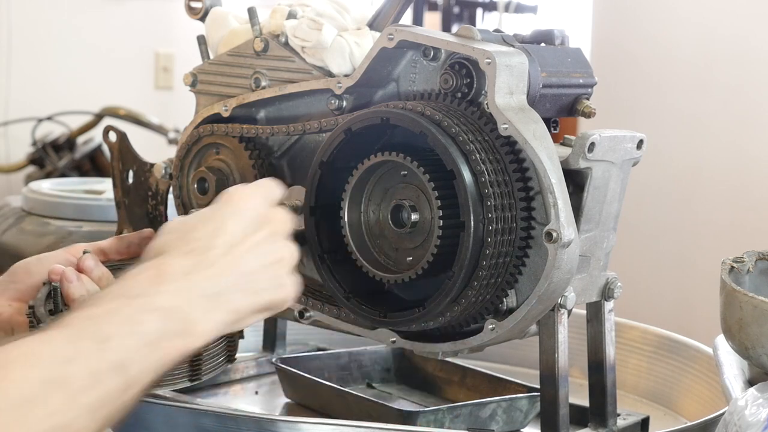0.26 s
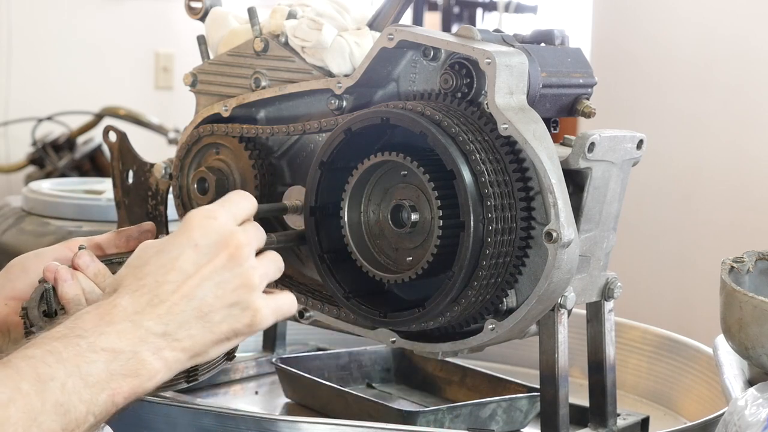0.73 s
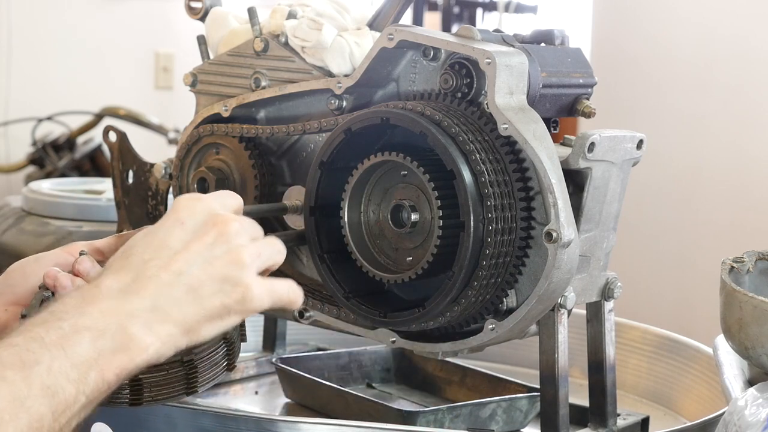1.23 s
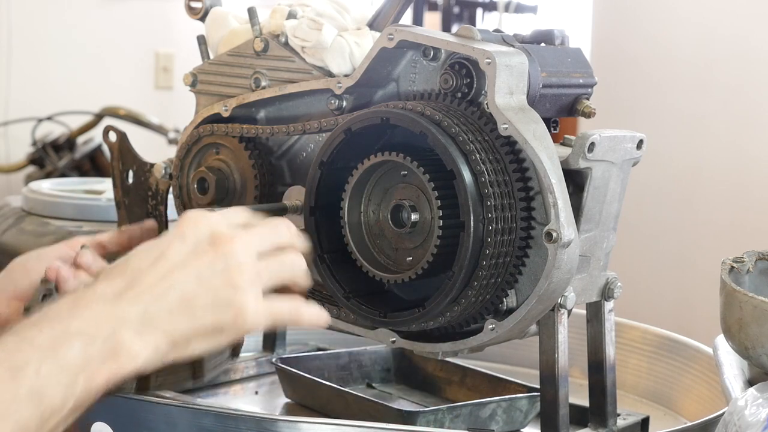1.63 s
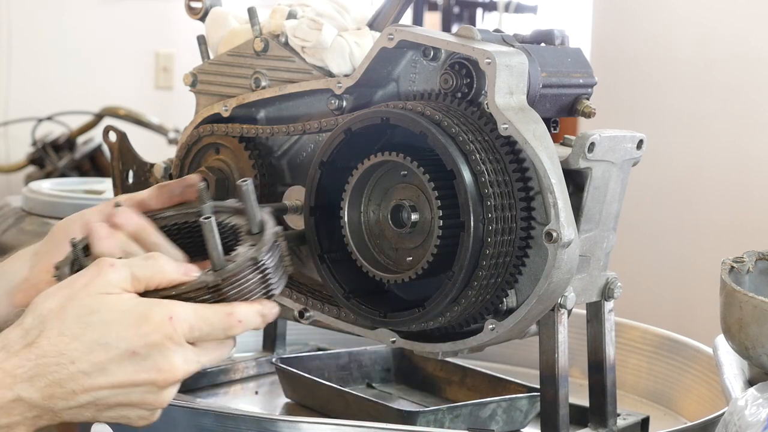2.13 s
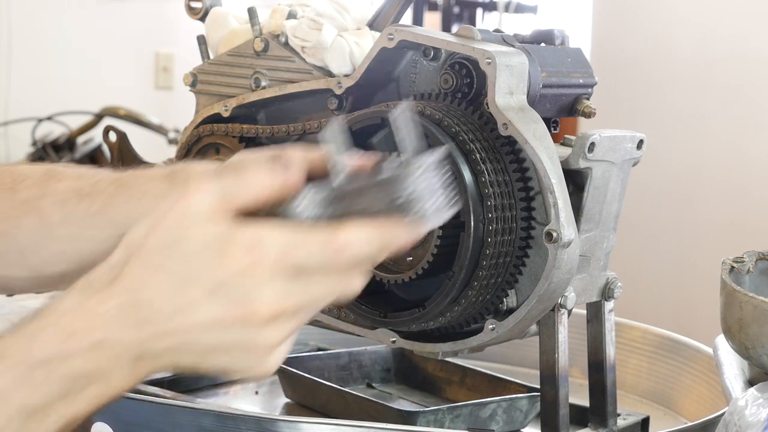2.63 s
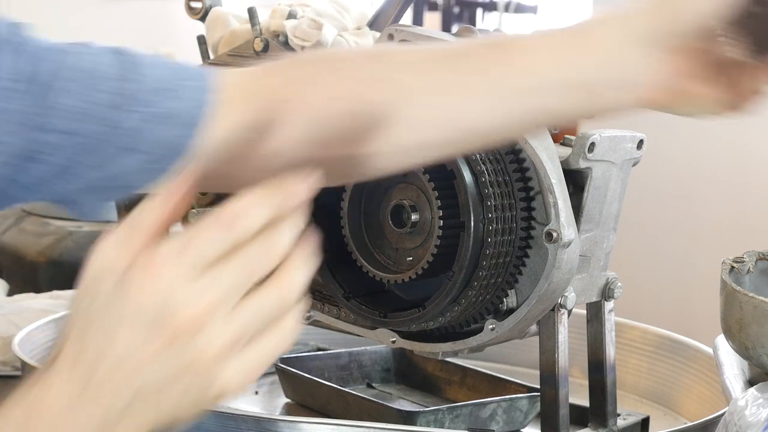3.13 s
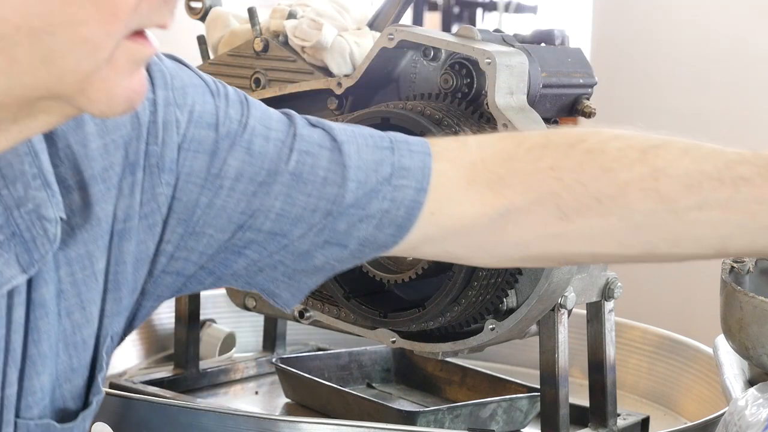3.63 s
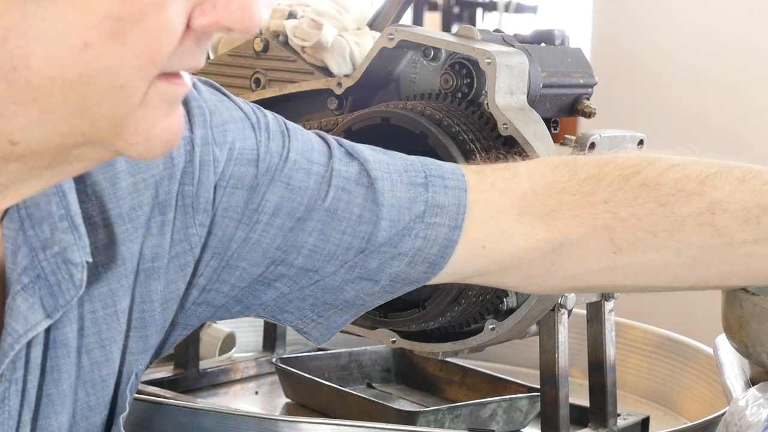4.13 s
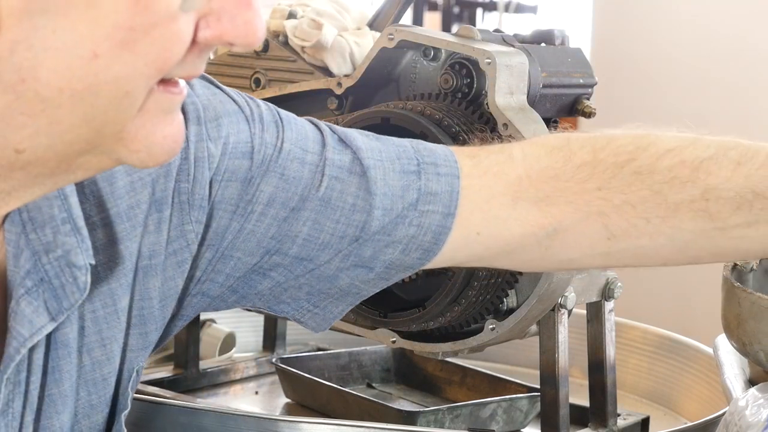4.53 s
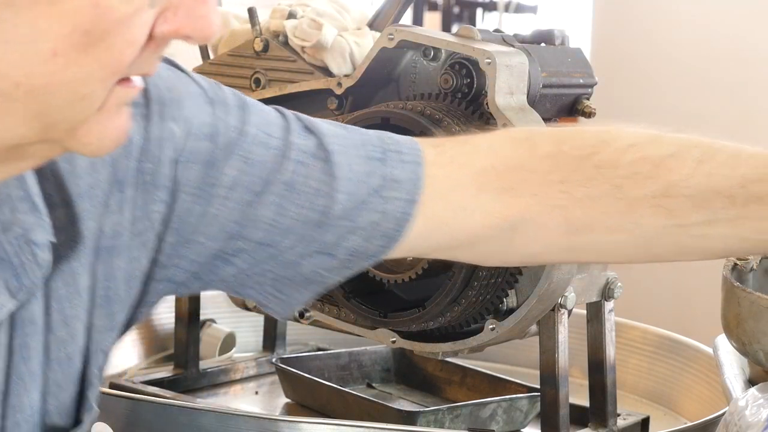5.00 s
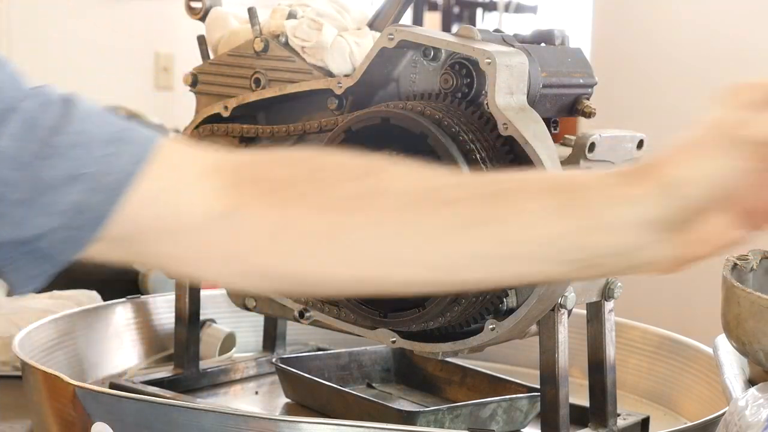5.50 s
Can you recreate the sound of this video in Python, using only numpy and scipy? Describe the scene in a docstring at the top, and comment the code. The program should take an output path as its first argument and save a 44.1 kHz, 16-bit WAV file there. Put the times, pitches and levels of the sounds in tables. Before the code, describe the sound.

In a hard-walled workshop, a small steel part's high ring fades in a metal tray. Sparse dry clicks and brief rattles follow as clutch plates are handled near the microphone. A shirt sleeve rustles close by, then the stack knocks and clashes into the tray, scrapes along and lands with a loud clank. The echo fades over faint low air hum.

```python
"""Steel clutch plates click and rattle dry off their studs, then knock, clash, slide and drop flat on a metal tray.
A shirt sleeve rustles close by; a small steel part sings on in the tray; a workshop echoes over a low hum of air.
Clicks: damped noise plus one sine. Blows: tray modes, filtered noise and detuned plate modes.
Slide, sleeve and air: filtered noise. Echo: convolution with noise decaying band by band."""
import sys
import numpy as np
from scipy import signal
from scipy.fft import rfft, irfft, next_fast_len
from scipy.io import wavfile

SR = 44100
rng = np.random.default_rng(int(sys.argv[2]) if len(sys.argv) > 2 else 0)


def bounce(signal):
    """Save signal as a 16-bit WAV file at the path given by the first command-line argument."""
    frames = np.transpose(np.atleast_2d(signal))
    limited = np.clip(frames, -1, 1)
    pcm = np.round(limited * 32767).astype(np.int16)
    wavfile.write(sys.argv[1], SR, pcm)


N = 253952
TIME = np.arange(N) / SR  # s, whole scene
RING = TIME[:SR]  # s since a contact


def undb(db):
    """Decibels to amplitude gain."""
    return 10 ** (np.asarray(db) / 20)


def read(points, hz):
    """Interpolate (f/Hz, value) rows on a logarithmic frequency axis."""
    f, v = np.transpose(points)
    return np.interp(np.log(hz + 1), np.log(f), v)


def swell(curve):
    """Gain over time, linear in dB between (t/s, level/dB) rows."""
    return undb(np.interp(TIME, *np.transpose(curve)))


def colour(x, points, tilt_db=0):
    """Minimum-phase filter with the given spectrum, tilted in dB per octave about 4 kHz (flat below 800 Hz)."""
    size = next_fast_len(len(x) + 4096, real=True)
    size += size % 2
    hz = np.fft.rfftfreq(size, 1 / SR)
    spectrum_db = read(points, hz) + tilt_db * np.log2(np.maximum(hz, 800) / 4000)
    # fold the cepstrum to positive time: a causal filter
    cepstrum = irfft(np.log(undb(spectrum_db)))
    cepstrum[1:size // 2] *= 2
    cepstrum[size // 2 + 1:] = 0
    return irfft(rfft(x, size) * np.exp(rfft(cepstrum)))[:len(x)]


def level(x, db):
    """Set the rms level."""
    return x * undb(db) / np.sqrt(np.mean(x ** 2))


def burst(x, db):
    """Give a sound the energy of 10 ms at this rms level."""
    return x * undb(db) / np.sqrt(np.sum(x ** 2) / (SR / 100))


def fade(t60_s):
    """Exponential decay, 60 dB in t60_s."""
    return np.exp(-np.log(1000) * RING / max(t60_s, 1e-4))


def crack(t60_s):
    """Decaying noise: countless close modes that die together."""
    return rng.choice([-1, 1], SR) * fade(t60_s)


def clink(hz, t60_s):
    """One decaying resonance."""
    return np.sin(2 * np.pi * hz * RING) * fade(t60_s)


def grit(spread_db):
    """Noise of dense tiny contacts; spread_db scales their exponentially distributed excess level."""
    return rng.standard_normal(N) * undb(spread_db * np.minimum(rng.exponential(size=N), 7))


def add(track, s, x):
    """Mix a sound in at a time."""
    start = max(int(s * SR), 0)
    track[start:start + len(x)] += x[:N - start]


def air_hum():
    """Steady noise, strongest in the bass: the air of the workshop."""
    # air spectrum: f/Hz, relative density/dB per Hz
    air_colour = [(15, -41), (25, -5), (87, -7), (114, -6.5), (212, -1.5), (416, -8), (463, -6.5),
                  (545, -11), (677, -14), (863, -13.5), (1610, -25.5), (1840, -24.5), (4610, -32),
                  (14000, -33), (16000, -36)]
    return level(colour(rng.standard_normal(N), air_colour), -63)


def workshop(x, gap_s=0.0053, build_s=0.0028):
    """Diffuse echo of hard walls: builds after a short gap, each octave band decaying at its own rate."""
    # reverberation time: f/Hz, t60/s
    room_t60 = [(100, 0.63), (500, 0.65), (2000, 1), (6000, 0.62), (10000, 0.68), (16000, 0.32)]
    # echo spectrum: f/Hz, gain/dB
    room_colour = [(60, -1.5), (200, 2.5), (500, 1.5), (1200, 0), (3000, -5), (7000, -4), (15000, -5.5)]
    hz = np.fft.rfftfreq(SR, 1 / SR)
    noise = rfft(rng.standard_normal(SR))
    centres_hz = 2. ** np.arange(6, 15)
    tail = 0
    # overlapping bands whose weights sum to one
    for centre_hz, share in zip(centres_hz, np.eye(len(centres_hz))):
        weight = read(list(zip(centres_hz, share)), hz)
        tail = tail + irfft(noise * weight, SR) * fade(read(room_t60, centre_hz))
    tail = tail * np.clip((RING - gap_s) / build_s, 0, 1)
    tail = tail / np.sqrt(np.sum(tail ** 2))
    return signal.fftconvolve(x, colour(tail, room_colour))[:N]


def stroke(peak_s, rise_s, fall_s):
    """Speed of one arm movement: a bell with its own rise and fall."""
    return np.exp(-((TIME - peak_s) / np.where(TIME < peak_s, rise_s, fall_s)) ** 2)


def cloth(bump_t60_s=0.019, bump_rise_t60_s=0.0028, snap_t60_s=0.0044, bump_low_hz=65):
    """The sleeve hisses and rumbles with arm speed, snaps where it pulls tight and bumps softly."""
    # arm lifts, carries, leans over, reaches down, lowers, lets go, draws back, returns:
    # peak/s, rise/s, fall/s, hiss/dB, rumble/dB
    arm_moves = [(2.21, 0.066, 0.15, -71, -58), (3.15, 0.57, 0.33, -67.5, -89), (3.5, 0.081, 0.1, -62, -83),
                 (3.71, 0.091, 0.13, -58, -88), (4.24, 0.16, .2, -61.5, -50),
                 (4.63, 0.17, 0.13, -66, -54.5), (4.97, 0.14, 0.18, -62.5, -52),
                 (5.75, 0.71, .2, -68.5, -73)]
    # soft bumps of hand and sleeve: t/s, level/dB, f/Hz
    bumps = [(2.356, -47.5, 116), (3.789, -43, 161), (4.109, -42.5, 278), (4.119, -38.5, 147),
             (4.177, -44, 110), (4.199, -38, 117), (4.326, -45, 107), (5.238, -54, 182)]
    # snaps of taut cloth: t/s, level/dB
    snaps = [(3.67, -56.5), (3.965, -54), (4.1095, -49.5), (4.117, -51), (4.17, -51), (4.1765, -48),
             (4.5161, -51.5), (5.242, -63.5), (5.376, -63)]
    # snap spectrum: f/Hz, relative density/dB per Hz
    snap_colour = [(1000, 3), (3500, -1), (7000, -10), (11000, 5.5), (12500, -5), (15500, -15)]
    # hiss spectrum: f/Hz, relative density/dB per Hz
    sleeve_colour = [(100, -2), (450, 11.5), (900, 13.5), (1800, 5.5), (4000, 2.5), (9000, 2),
                     (15500, -4.5)]
    # rumble spectrum: f/Hz, relative density/dB per Hz
    rub_colour = [(20, -41), (55, -12), (100, -5.5), (160, -8), (260, -15.5), (600, -19), (3000, -47)]
    hiss = level(colour(grit(spread_db=3.5), sleeve_colour), 0)
    rumble = level(colour(rng.standard_normal(N), rub_colour), 0)
    out = np.zeros(N)
    for peak_s, rise_s, fall_s, hiss_db, rumble_db in arm_moves:
        rustle = undb(hiss_db) * hiss + undb(rumble_db) * rumble
        out += stroke(peak_s, rise_s, fall_s) * rustle
    no_sub = signal.butter(2, bump_low_hz, "high", fs=SR, output="sos")
    for s, db, hz in bumps:
        bump = clink(hz, bump_t60_s) * (1 - fade(bump_rise_t60_s))  # soft onset
        add(out, s, burst(signal.sosfilt(no_sub, bump), db))
    for s, db in snaps:
        add(out, s, burst(colour(crack(snap_t60_s), snap_colour), db))
    return out


def dropped_part(ping_hz=8285, ping_db=-52, ping_t60_s=0.62, tray_db=-42, tray_t60_s=0.92):
    """A small steel part just laid in the tray sings on two close modes while the sheet metal dies away."""
    # ringing sheet: f/Hz, relative density/dB per Hz
    sheet_colour = [(150, -39), (480, -5.0), (750, -9), (1200, -10.5), (1900, -10.5),
                    (2800, -13.5), (4500, -22.5), (12000, -34.5)]
    ping = clink(ping_hz, ping_t60_s) + 0.45 * clink(8398, ping_t60_s)
    sheet = colour(crack(tray_t60_s), sheet_colour)
    out = np.zeros(N)
    add(out, 0, burst(ping, ping_db) + burst(sheet, tray_db))
    return out


def tick(tilt_db, hz, clink_db=-11, clink_t60_s=0.024, crack_t60_s=0.021):
    """Parts held in the hand cannot ring long: a dry tick with one pitch standing out."""
    # tick spectrum: f/Hz, relative density/dB per Hz
    click_colour = [(150, -19.5), (600, -5), (1350, -2.5), (1900, -1.5), (2400, -3.5), (3600, 2.5),
                    (4900, -1.5), (7200, -0.5), (8300, -7.5), (10000, -10.5), (15500, -28.5)]
    dry_crack = colour(crack(crack_t60_s), click_colour, tilt_db)
    return burst(dry_crack, 0) + burst(clink(hz, clink_t60_s), clink_db)


def rattles(first_gap_s=.0075, gap_ratio=.9, shortest_gap_s=0.0045,
            scatter_db=1, centre_hz=6570, pitch_spread=0.195):
    """A plate chatters along the studs: gaps shrink to a floor, level and pitch scatter."""
    # chatter: start/s, length/s, first level/dB, last level/dB, tilt/dB per octave
    runs = [(0.935, .019, -56.5, -49, 2), (1.287, 0.045, -47, -47.5, 1), (3.733, .024, -53.5, -51, -7.5)]
    out = np.zeros(N)
    for start_s, length_s, first_db, last_db, tilt_db in runs:
        gaps_s = np.maximum(first_gap_s * gap_ratio ** np.arange(20), shortest_gap_s)
        delays_s = np.cumsum(gaps_s) - gaps_s[0]
        for after_s, (force, pitch) in zip(delays_s, rng.standard_normal((20, 2))):
            if after_s < length_s:
                db = first_db + (last_db - first_db) * after_s / length_s + scatter_db * force
                hz = centre_hz * np.exp(pitch_spread * pitch)
                add(out, start_s + after_s, burst(tick(tilt_db, hz), db))
    return out


def clicks():
    """Single contacts between steel parts in the hand, one damped tick each."""
    # contacts: t/s, level/dB, tilt/dB per octave, strongest resonance/Hz
    contacts = [(.435, -70.5, -5, 5300), (.502, -67.5, -12, 2020), (0.7126, -41.5, -0.5, 1400),
                (0.941, -43.5, 7.5, 5930), (0.967, -56, -3, 5900), (1.185, -41.5, 1, 5760),
                (1.266, -44, -3.5, 7200), (1.2785, -38.5, 0.5, 6860), (1.3187, -40, 5.5, 4800),
                (1.3304, -39.5, 1.5, 1770), (2.2614, -57.5, -17, 3800), (2.657, -46.5, 3.5, 4080),
                (3.3562, -58, -10, 1500), (3.406, -61.5, -5, 6500), (3.4402, -58.5, 4.5, 5300),
                (3.490, -55, -1.5, 6530), (3.535, -57.5, 8, 6200), (4.537, -48, -5.5, 10700),
                (4.663, -41, -6.5, 7150)]
    out = np.zeros(N)
    for s, db, tilt_db, hz in contacts:
        add(out, s, burst(tick(tilt_db, hz), db))
    return out


def clash_colour(face):
    """Spectrum of plate on plate, blended from rim contact (0) to face contact (1)."""
    # damped clash: f/Hz, rim density/dB per Hz, face density/dB per Hz
    clash_points = [(290, -9.5, -39.5), (876, -8.5, -5), (1148, 3, -1), (1550, -14.5, -8.5),
                    (1820, -10, -3), (2280, -4.5, -0.5), (2970, 5.5, -14), (4290, -10, 0.5),
                    (5200, -0.5, -10), (8340, -12, -16), (9600, -9, -12.5), (11500, -16.5, -12),
                    (15400, -35, -19)]
    return [(hz, rim_db + face * (face_db - rim_db)) for hz, rim_db, face_db in clash_points]


def plate_ring(face, tilt_db, mistune=0.00598, count=3):
    """Contact point sets each mode's drive; no two plates are quite alike, so their modes beat."""
    # plate modes: f/Hz, rim-struck level/dB, face-struck level/dB, t60/s
    plate_modes = [(1077, -8, -8, .4), (1167, -9, -1, .35), (1265, 2, -10, .25), (2245, -4, -2, .5),
                   (2535, -16, -4, .4), (2700, -13, -3, .5), (2868, 1, -8, .35), (2912, 4, -9, .35),
                   (3297, -8, -3, .65), (3496, -1, -6, .6), (3820, -13, -5, .6), (4490, -10, -8, .5),
                   (4690, -14, -7, .4), (4892, -4, -9, .45), (5100, -4, -16, .3), (5390, -12, -8, .35),
                   (5780, -7, -11, .35), (6430, -16, -9, .55), (6930, -11, -16, .4), (8930, -15, -14, .3),
                   (10310, -19, -19, .4), (10820, -19, -17, .35), (11610, -30, -15, .3),
                   (15010, -45, -15, .33)]
    out = 0
    for hz, rim_db, face_db, t60_s in plate_modes:
        db = rim_db + face * (face_db - rim_db) + tilt_db * np.log2(hz / 4000)
        detune_hz = mistune * np.sqrt(hz * 4000) * rng.standard_normal((count, 1))
        cycles = (hz + detune_hz) * RING + rng.random((count, 1))
        plates = np.sin((2 * np.pi * cycles).astype(np.float32)).sum(axis=0)
        out = out + undb(db) * fade(t60_s) * plates
    return out


def tray_thud(low_hz=120, high_hz=1450):
    """The tray's low modes, damped by the weight on them; each starts a quarter cycle behind the one before."""
    # loaded tray: f/Hz, level/dB, t60/s
    tray_modes = [(141, -12.5, 0.077), (264, -1.5, 0.023), (405, 0.5, 0.053), (465, -5.5, 0.052),
                  (550, -3, 0.053), (630, 1, 0.013), (723, 2, 0.022), (855, -6.5, 0.035), (1040, -15, 0.01),
                  (1175, -1.5, 0.046)]
    modes = 0
    for k, (hz, db, t60_s) in enumerate(tray_modes):
        modes = modes + undb(db) * fade(t60_s) * np.sin(2 * np.pi * hz * RING - k * np.pi / 2)
    band = signal.butter(2, [low_hz, high_hz], "band", fs=SR, output="sos")
    return signal.sosfilt(band, modes)


def sliding(grain_db=0.5):
    """Steel catches and slips on the tray as grainy noise; noise also drives the plates as one scrapes the next."""
    # stack on the tray: t/s, level/dB
    slide_curve = [(4.42, -80), (4.45, -52), (4.52, -49.5), (4.56, -37.5), (4.61, -34), (4.63, -46),
                   (4.7, -62), (4.8, -74.5)]
    # plate over plate: t/s, level/dB
    scrape_curve = [(4.755, -87), (4.764, -47), (4.777, -42), (4.79, -47), (4.805, -58), (4.83, -95)]
    # tray driven by the sliding stack: f/Hz, relative density/dB per Hz
    slide_colour = [(60, -31), (140, -3), (300, -7), (540, 2.5), (700, -0.5), (900, -12), (1170, -5),
                    (1550, -17), (2500, -19), (4000, -28), (7000, -33), (15000, -46)]
    rub = colour(grit(spread_db=grain_db), slide_colour)
    clash = colour(crack(0.017), clash_colour(0.73), tilt_db=0.5)
    steel = burst(clash, 0) + burst(plate_ring(1.0, 0), -5.5)
    scrape = signal.fftconvolve(grit(spread_db=0.0), steel)[:N]
    return level(rub, 0) * swell(slide_curve) + level(scrape, 0) * swell(scrape_curve)


def blows(ring_db=-9, clash_t60_s=0.053, tail_db=-11, tail_t60_s=0.4, clink_db=-6.0, clink_t60_s=0.038):
    """Each landing thuds in the tray; loose plates slap together as noise over the chatter time, and ring."""
    # landings: t/s, thud/dB, clash/dB, clash tilt/dB per octave, chatter/s,
    # contact (0 rim .. 1 face), clink/Hz
    landings = [(.002, -47.5, -47, -7.5, 0.059, 0.8, 1910), (3.7671, -60, -42, -4, 0.0054, 0.098, 2530),
                (3.7872, -40, -55, 3, .004, 0, 1240), (3.7983, -33.5, -25.5, -3, 0.0031, 0.045, 5120),
                (3.9818, -39, -36, -4.5, 0.0072, 0.24, 2080), (4.218, -46.5, -44, -8, 0.0028, 0.71, 2580),
                (4.2236, -56, -30, -0.5, 0.0029, 0.4, 2314), (4.2284, -48, -30.5, 3, 0.0084, 1, 2565),
                (4.25, -66, -43, 12, 0.047, 0.5, 4020), (4.278, -48, -36.5, 0.5, 0.0063, 0.85, 2650),
                (4.324, -40, -52, -14, 0.0018, 0.68, 627), (4.424, -41.5, -43.5, -8, 0.011, 0.29, 1034),
                (4.6164, -23, -28, -0.5, 0.0026, 0.41, 1150)]
    out = np.zeros(N)
    for s, thud_db, clash_db, tilt_db, chatter_s, contact, clink_hz in landings:
        face = np.clip(contact, 0, 1)
        # full level during the chatter, then decay
        closing = np.exp(np.log(1000) * np.minimum(chatter_s - RING, 0) / clash_t60_s)
        slaps = burst(rng.standard_normal(SR) * closing, 0) + burst(crack(tail_t60_s), tail_db)
        add(out, s, burst(colour(slaps, clash_colour(face), tilt_db), clash_db))
        onset = np.minimum(RING / max(chatter_s, .001), 1)
        add(out, s, burst(plate_ring(face, tilt_db) * onset, clash_db + ring_db))
        add(out, s, burst(tray_thud(), thud_db))
        add(out, s, burst(clink(clink_hz, clink_t60_s), max(clash_db, thud_db) + clink_db))
    return out


def scene():
    """Clicks are close and dry; the tray stands further off and sends more into the room."""
    near = clicks() + rattles()
    far = blows() + sliding()
    echo = workshop(undb(-10) * near + undb(-7.0) * far)
    return (near + far + echo + dropped_part() + cloth() + air_hum())[None]


def record(dry, top_hz=15900):
    """The recorder cuts the top: a steep elliptic low-pass."""
    top_cut = signal.ellip(10, .2, 70, top_hz, fs=SR, output="sos")
    return signal.sosfilt(top_cut, dry)


dry = scene()
out = record(dry)
bounce(out)
```